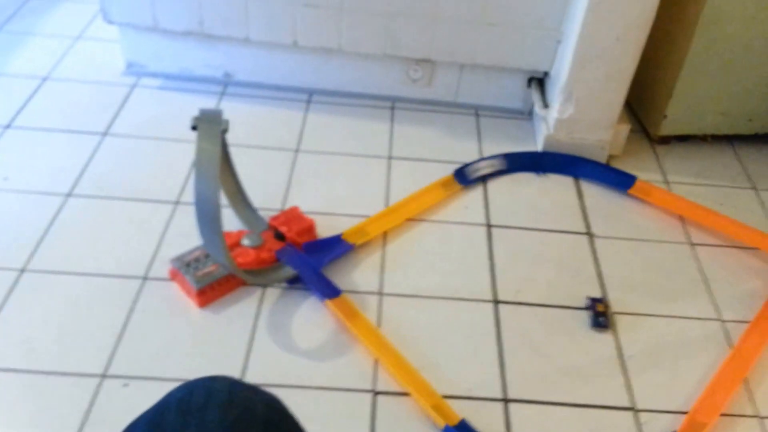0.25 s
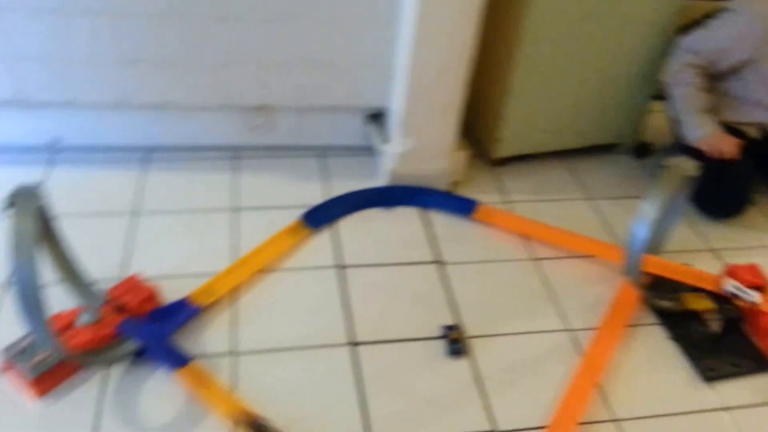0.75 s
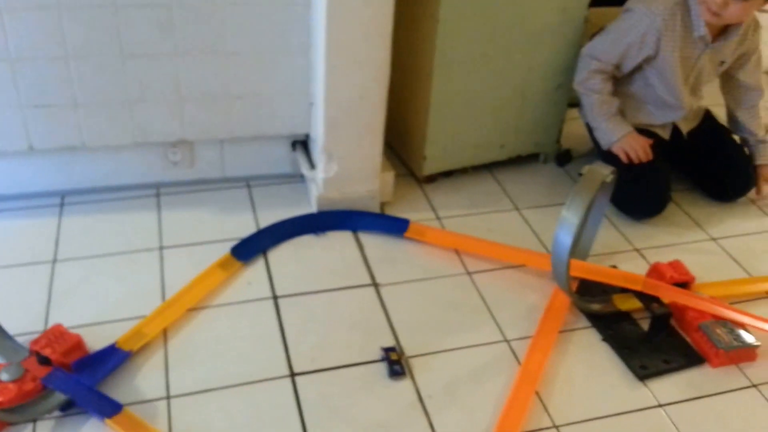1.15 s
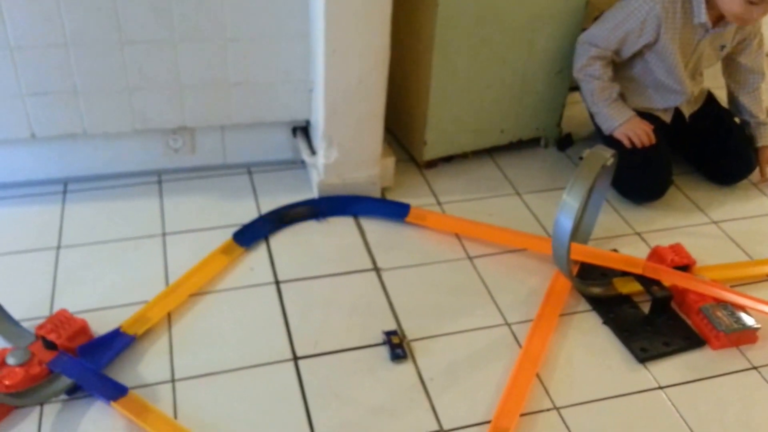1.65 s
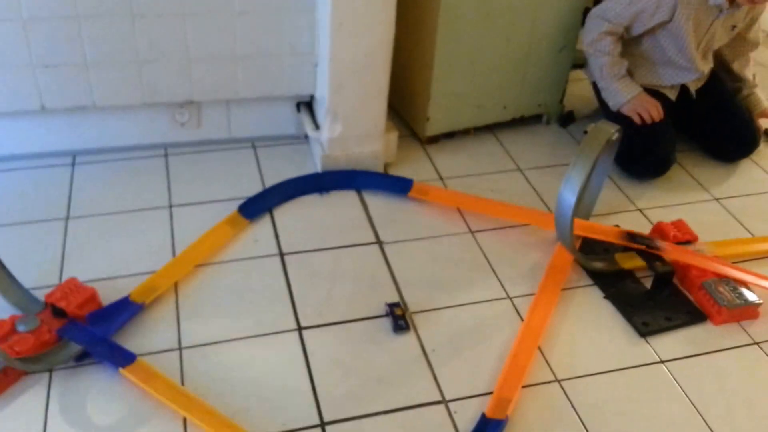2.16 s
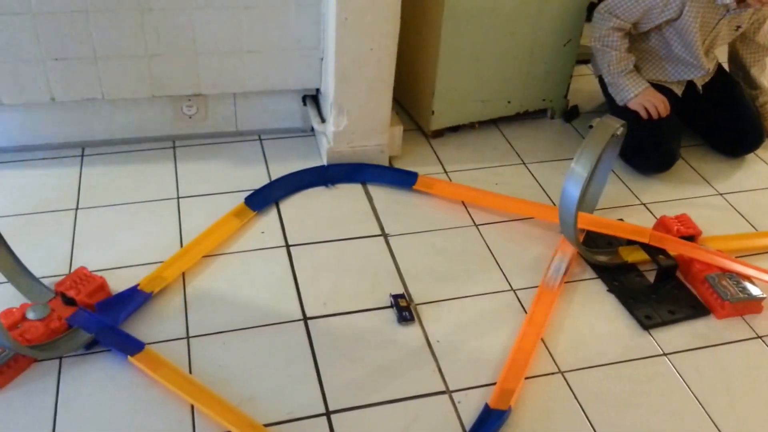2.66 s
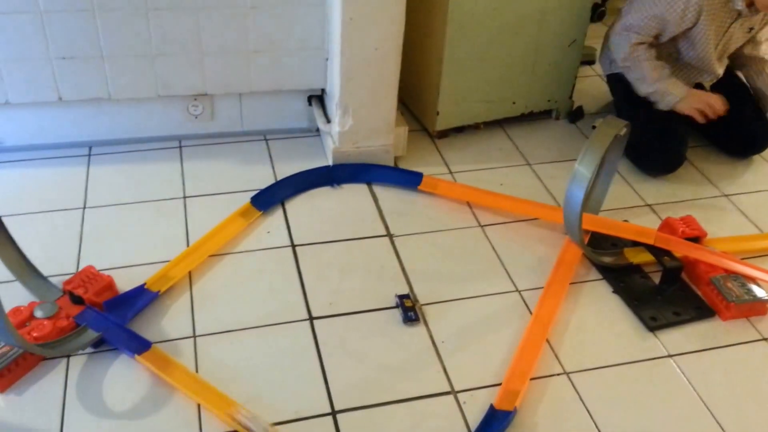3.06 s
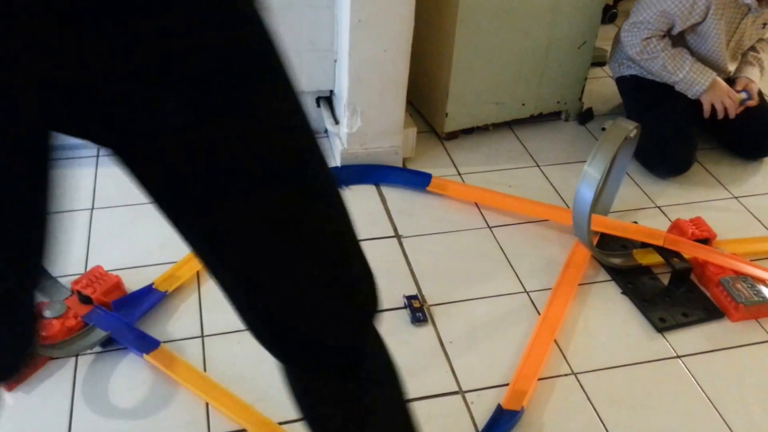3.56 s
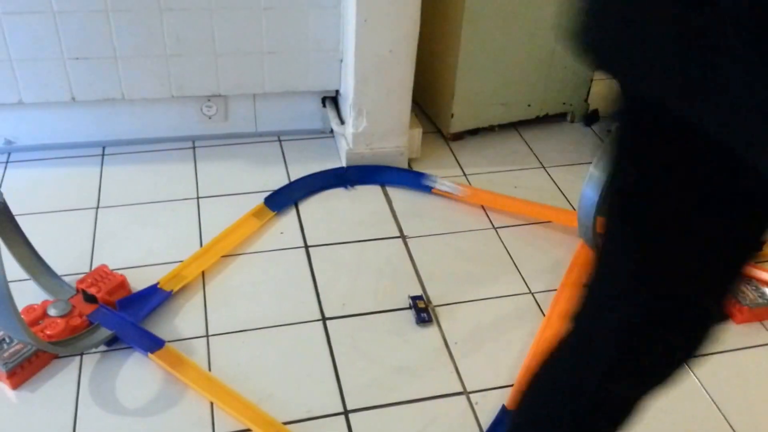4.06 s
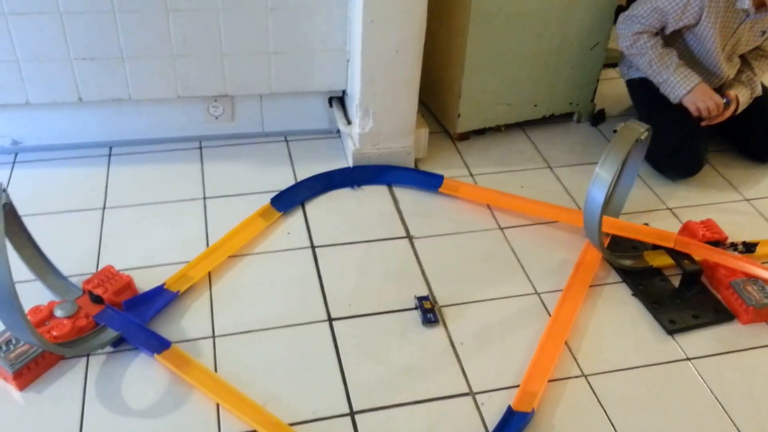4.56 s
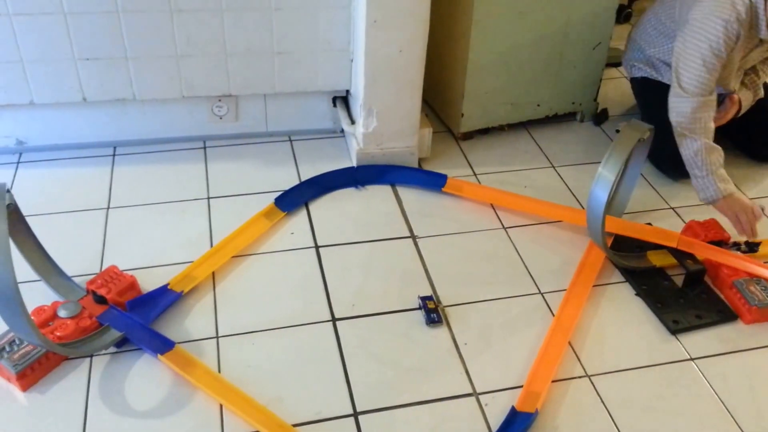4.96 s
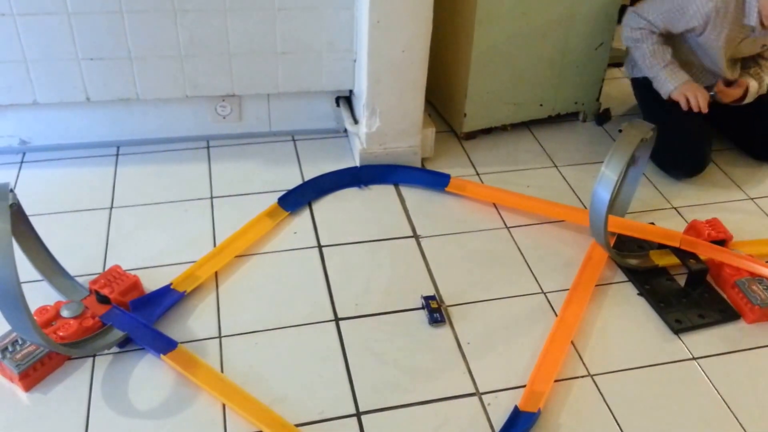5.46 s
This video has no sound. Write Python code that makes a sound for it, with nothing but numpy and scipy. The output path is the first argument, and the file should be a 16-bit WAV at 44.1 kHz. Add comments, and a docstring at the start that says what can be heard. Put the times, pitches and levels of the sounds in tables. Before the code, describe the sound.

Small toy cars run laps on a plastic track laid on tiles. Booster motors whirr throughout, their gears chattering in surges. Wheel patter swells and fades, with resonant stuttering scrapes in bends and sharp clacks at joints. Hard hits come near 1.1, 2.25 and 3.4 seconds, then it grows sparser after 4.2 until a last run from about 4.7. Close stereo microphones, small reverberant room.

```python
"""Toy cars on a plastic track

Cars race a circuit on a tiled floor in a small hard room, with the microphones held above it.
Motor boosters whirr throughout, chatter in surges of gear ticks, ring with loose panels and knock hollowly when hit.
Runs of filtered patter swell and fade as wheels; resonant stutter scrapes in the bends; brief noise flurries
tick over seams, clack on joints and walls, and thud on the floor."""
import sys
import numpy as np
from scipy import signal
from scipy.fft import rfft, irfft
from scipy.io import wavfile

SR = 44100
rng = np.random.default_rng(int(sys.argv[2]) if len(sys.argv) > 2 else 0)


def unload_audio(sound):
    """Save the sound as a 16-bit wav file, at the path given as the first command line argument."""
    columns = np.transpose(np.atleast_2d(sound))
    # keep every value between -1 and 1, then stretch to whole-number steps
    steps = np.round(np.clip(columns, -1, 1) * 32767)
    wavfile.write(sys.argv[1], SR, steps.astype(np.int16))


N = 252252
TIME = np.arange(N) / SR  # seconds


def boosters(whirr_db=-29.0, ring_db=0, chatter_db=-1.0, idle_chatter_db=-41, surge_rise_s=0.026,
             surge_fade_db_per_s=91, wheel_hz=25, wander=0.0964, throb_db=3, flutter_db=1.5,
             teeth_hz=650, soft_hz=3500, slip=0.043, waver_db=1.5):
    """Loose gears tick in the housing, harder once a drive-wheel turn, over a whirr whose whine follows motor speed."""
    # moments when the gears chatter harder: peak_s, level_db (before chatter_db)
    surges = [(0.19, -28), (0.38, -27.5), (0.69, -27), (0.88, -25), (1.35, -37), (1.53, -31), (1.85, -34),
              (2.17, -21.5), (2.81, -28.5), (3.2, -29), (3.44, -35), (3.98, -31.5), (4.18, -50),
              (4.97, -29), (5.12, -29)]
    # colour of the gear mesh: hz, relative_db
    whirr_colour = [(30, -50), (100, -52), (170, -9.5), (300, -2.5), (550, -1), (900, 1.5), (1400, 2),
                    (2000, 2.5), (2600, -1), (4500, -3), (6000, -15), (10000, -33), (14500, -85)]
    # gear noise that rises and falls with motor speed: centre_hz (at mean speed), width_hz (of each pass), gain_db
    whines = [(874, 390, 4), (1885, 570, -3)]

    turns = np.cumsum(wheel_hz * (1 + wander * drift(1.8))) / SR
    throb = amp(throb_db * np.sin(2 * np.pi * turns))
    ticks = below(above(impacts(per_s=660, spread_db=4.5), teeth_hz), soft_hz)
    teeth = room(housing(ticks, waver_db=2.5), early_db=3.0, tail_db=-0.5)
    power = amp(idle_chatter_db) ** 2
    for peak_s, level_db in surges:
        power = power + (amp(level_db) * swell(peak_s, surge_rise_s, surge_fade_db_per_s)) ** 2
    chatter = levelled(teeth * throb, (750, 1150)) * amp(chatter_db) * np.sqrt(power)

    mesh = coloured(impacts(per_s=2200, spread_db=2.0) * amp(flutter_db * drift(29)), whirr_colour)
    speed = 1 + slip * drift(5.9)  # relative to the mean
    whine = np.zeros(N)
    for hz, width_hz, gain_db in whines:
        gain = amp(gain_db + waver_db * drift(4.2))
        whine += gain * resonate_twice(mesh, hz * speed, width_hz)
    body = amp(ring_db) * housing(mesh, waver_db=1)
    whirr = roaming(mesh + whine + body, early_db=6.0, tail_db=-1.5)
    return chatter + amp(whirr_db) * whirr / whirr.mean(0).std()


def housing(x, waver_db=0):
    """The hollow plastic body of a booster; while it shakes, now one mode stands out and now another."""
    # modes of the body: hz, width_hz, gain_db (mean)
    modes = [(322, 23, -1), (462, 55, -9), (551, 10, -20), (596, 32, -3), (697, 81, -1.5), (786, 16, -9),
             (870, 65, 6), (1009, 28, 2), (1062, 66, 4), (1170, 23, -17), (1705, 130, -7), (1860, 290, -13)]
    return sum(amp(gain_db + waver_db * drift(4.7)) * resonate(x, hz, width_hz)
               for hz, width_hz, gain_db in modes)


def wheels(rattle_db=-3.0, hiss_db=-9.0, far_rattle_db=-41, far_hiss_db=-42, rattle_fade_db_per_s=70.5,
           hiss_fade_db_per_s=77, judder_db=2, pan_share=0.74):
    """Hard wheels patter on the plastic strip while the wire axles hiss; the runs add up in power."""
    # cars run onto a piece of track, then coast away: peak_s, approach_s,
    # rattle_level_db (before rattle_db), hiss_level_db (before hiss_db), left_right_db (before pan_share)
    runs = [(0.01, 0.23, -22.5, -30.5, 4), (0.125, 0.017, -23, -36, 1), (0.19, 0.042, -32, -23.5, 8),
            (0.28, 0.065, -25.5, -36, 6), (0.42, 0.29, -28.5, -35, -6), (0.58, 0.12, -25, -35, 4),
            (0.81, 0.37, -26, -38.5, 3), (1.008, 0.028, -23.5, -36.5, -1), (1.094, 0.018, -18.5, -23.5, 1),
            (1.4, 0.086, -25.5, -26.5, 1), (1.51, 0.042, -21.5, -24.5, -0.5), (1.79, 0.097, -23.5, -33, 0),
            (2.255, 0.013, -20.5, -23, 5), (2.305, 0.011, -20.5, -27, 0), (2.66, 0.062, -21.5, -29.5, 4),
            (2.79, 0.032, -27, -46, 1), (2.935, 0.026, -25, -35, 6), (3.04, 0.047, -23, -26, 1),
            (3.14, 0.088, -24.5, -32, 2.5), (3.425, 0.019, -18, -20.5, -0.5), (3.58, 0.023, -27.5, -31, -5),
            (3.8, 0.064, -22.5, -29, -1), (4.01, 0.038, -26, -27.5, -5), (4.76, 0.082, -31.5, -33, 8),
            (5.0, 0.073, -43, -39, -6), (5.21, 0.17, -22, -28, 2.5), (5.624, 0.0011, -20.5, -23, 7)]
    # colour of the plastic strip: hz, relative_db
    track_colour = [(60, -58), (160, -50), (300, -9.5), (700, -2.5), (1350, -6), (1900, 0.5), (2600, 2),
                    (3600, -1), (4500, -0.5), (5600, -10), (8000, -18.5), (14000, -74.5)]
    # colour of the axles: hz, relative_db
    axle_colour = [(1000, -84), (4000, -8), (5500, -1), (7000, 5), (10500, 4.5), (12000, -3.5),
                   (13500, -17), (14500, -49)]

    # steady floor from cars on the far side of the circuit
    rattle_power, hiss_power = amp(far_rattle_db) ** 2, amp(far_hiss_db) ** 2
    for peak_s, rise_s, roll_db, axle_db, pan_db in runs:
        sides = amp(pan_share * np.array([[pan_db], [-pan_db]]) / 2)
        roll = sides * amp(roll_db) * swell(peak_s, rise_s, rattle_fade_db_per_s)
        axle = amp(axle_db) * swell(peak_s, rise_s, hiss_fade_db_per_s)
        rattle_power = rattle_power + roll ** 2
        hiss_power = hiss_power + axle ** 2
    patter = impacts(per_s=1600, spread_db=3.5) * amp(judder_db * drift(37))
    rattle = roaming(coloured(patter, track_colour), early_db=8.5, tail_db=3.0, count=5)
    rattle = levelled(rattle, (3400, 5500))
    hiss = roaming(coloured(patter, axle_colour), early_db=6, tail_db=9.5)
    hiss = levelled(hiss, (6000, 11000))
    return amp(rattle_db) * rattle * np.sqrt(rattle_power) + amp(hiss_db) * hiss * np.sqrt(hiss_power)


def bends(scrape_db=-8.0, fade_db_per_s=149, judder_db=2, slide_s=0.25, spin_hz=105, spin_db=4):
    """Pressed to the outer wall, a car stutters harder once a wheel turn; the wall's ring slides as it moves on."""
    # cars sweep through a bend or loop: peak_s, approach_s, level_db (before scrape_db),
    # ring_hz (at the peak), slide_hz_per_s, width_hz (of each pass)
    sweeps = [(0.11, 0.28, -19.5, 3450, -1000, 1210), (0.29, 0.055, -17.5, 3900, -2000, 1100),
              (0.385, 0.06, -12.5, 2800, -5000, 1050), (.46, 0.047, -22.5, 2500, -1000, 900),
              (0.625, 0.062, -13.5, 2860, -500, 650), (0.7, .05, -17.5, 2950, -800, 700),
              (1.175, 0.055, -15, 3500, -800, 1300), (1.41, 0.16, -18, 3500, -1000, 1410),
              (1.735, 0.022, -13.5, 2930, -2500, 990), (1.82, 0.077, -12, 2580, -1500, 1150),
              (2.325, 0.02, -14, 4000, -3000, 1210), (2.385, 0.04, -14, 3400, -5000, 1700),
              (2.67, 0.073, -14.5, 3170, 3998, 1920), (2.965, 0.046, -15, 2850, -1000, 950),
              (3.085, 0.059, -16, 2700, 500, 1600), (3.505, 0.074, -16.5, 3600, -1500, 1600),
              (3.74, 0.23, -16, 3070, -2000, 2000), (4.003, .012, -15, 2920, -3000, 1200),
              (4.075, 0.036, -17, 2700, 0, 850), (5.285, 0.06, -15, 3330, 0, 1600)]

    scrapes = np.zeros(N)
    turns = np.cumsum(spin_hz * (1 + 0.1 * drift(8.14))) / SR
    spin = spin_db * np.sin(2 * np.pi * turns)
    judder = judder_db * above(drift(130), 41)
    stutter = impacts(per_s=900, spread_db=0.0) * amp(spin + judder)
    for peak_s, rise_s, level_db, hz, slide, width_hz in sweeps:
        near = abs(TIME - peak_s) < .5
        ring_hz = hz + slide * np.clip(TIME[near] - peak_s, -slide_s, slide_s)
        scrape = stutter[near]
        for stage in range(3):  # three passes give the ring steep flanks
            scrape = resonate(scrape, ring_hz, width_hz)
        scrapes[near] += amp(level_db) * swell(peak_s, rise_s, fade_db_per_s)[near] * evened(scrape)
        stutter = np.roll(stutter, SR)  # a different stretch of stutter for the next sweep
    return amp(scrape_db) * roaming(scrapes, early_db=2, tail_db=-5.0)


def knocks(ring_db=0.5, housing_db=4, width_hz=210):
    """A car slams into hollow plastic: a push, the ring of the struck part, and the housing behind it."""
    # cars hit a booster or track support: start_s, blow_db (relative), ring_hz, push_db (relative to the blow)
    hits = [(1.083, -13.5, 715, -15), (1.095, -18, 736, -10), (1.107, -17, 736, -12),
            (2.241, -18, 950, -10), (2.255, -20, 1060, -32), (2.279, -31.5, 1030, 2.5),
            (3.146, -27, 860, -8), (3.406, -20, 930, -7), (3.4205, -23.5, 637, -2), (3.433, -21, 850, -5),
            (5.141, -20.5, 940, -6), (5.625, -33, 920, 1)]
    # colour of the hollow push: hz, relative_db
    push_colour = [(60, -40), (130, -22), (220, -23), (300, 4.5), (430, 16), (540, 9), (700, -3),
                   (1100, -5), (1600, -10), (3500, 6), (9000, -112)]

    blows, rings = np.zeros((2, N))
    for start_s, level_db, hz, push_db in hits:
        blow = amp(level_db) * bounce(t60=0.015)
        ring = resonate_twice(blow, hz, width_hz)
        add(blows, start_s, amp(push_db) * blow)
        add(rings, start_s, evened(ring) * blow.std())
    push = coloured(blows, push_colour)
    struck = push + amp(housing_db) * housing(push) + amp(ring_db) * rings
    return roaming(struck, early_db=11.5, tail_db=-2.5)


def clacks(ring_db=-6.0, shell_db=-7.0, snap_db=-6.5, width_hz=1000, shell_share=0.24, soft_hz=8000):
    """Each clack rings one piece of track; a sharper blow rings the car's shell more and has more bright snap."""
    # cars clack on a joint or wall: start_s, blow_db (relative), ring_hz,
    # treble_db (snap relative to the blow, before snap_db), t60_s (nominal bounce decay)
    hits = [(0.175, -31, 3950, 14.5, 0.035), (0.373, -19, 2650, -26, 0.013), (0.389, -24, 2900, -30, 0.004),
            (0.3918, -15, 2620, -39, 0.004), (0.4017, -18, 2900, -40, 0.0048),
            (0.4233, -14, 2280, -30, 0.029), (0.577, -18.5, 4240, -19, 0.028),
            (0.5875, -22, 2300, -12, 0.0046), (0.61, -19.5, 2860, -30, 0.005),
            (0.6384, -15.5, 2670, -30, 0.0054), (0.675, -16, 3020, -26, 0.017),
            (0.695, -15, 2830, -30, 0.012), (0.7036, -16, 2800, -30, 0.006), (0.815, -24, 6770, -4, 0.045),
            (0.972, -25, 2800, -23, 0.0031), (1.078, -23, 6800, -6, 0.0094), (1.094, -17, 1920, 7, 0.1),
            (1.097, -16, 1900, -16, 0.011), (1.111, -20, 1450, -12, 0.022), (1.126, -21, 3400, -20, 0.014),
            (1.154, -14, 3220, -20, 0.0044), (1.204, -22, 3600, -37, 0.0078),
            (1.335, -18.5, 2000, -7, 0.082), (1.491, -20, 3480, 4, 0.013), (1.508, -26, 3500, 10, 0.07),
            (1.529, -20, 1920, -11, 0.038), (1.542, -21, 2460, -10, 0.0046),
            (1.8045, -11, 2430, -32, 0.038), (1.813, -14, 2680, -29, 0.013),
            (1.836, -12.5, 2380, -18, 0.01), (2.2503, -14, 2430, 0.5, 0.0088),
            (2.257, -16.5, 3750, 3.5, 0.017), (2.2942, -13, 4260, 6.5, 0.0058),
            (2.305, -14, 3960, -20, 0.25), (2.61, -18, 2650, -40, 0.0084),
            (2.629, -16.5, 2550, -22, 0.0065), (2.6463, -20, 2300, -23, 0.0064),
            (2.662, -16, 3400, -23, 0.028), (2.912, -14.5, 4350, -15, 0.086), (2.932, -16, 3820, 1, 0.008),
            (2.955, -14.5, 2930, -31, 0.0065), (2.9744, -17, 2700, -25, 0.004),
            (2.982, -17, 2800, -21, 0.0034), (3.123, -27, 3600, 5, 0.04), (3.146, -23, 2740, -20, 0.0045),
            (3.403, -28, 2200, 1, 0.023), (3.4195, -14, 3670, 5.5, 0.0047),
            (3.421, -12.5, 1800, -10, 0.0062), (3.431, -22, 1400, -14, 0.013),
            (3.46, -22, 1800, -19, 0.012), (3.5819, -18, 3880, 2, 0.011), (4.024, -29, 2800, -25, 0.0048),
            (4.041, -16, 2190, -14, 0.015), (4.062, -13.5, 2420, -17, 0.0093),
            (4.0838, -9.5, 2700, -32, 0.0049), (4.0924, -19.5, 2720, -34, 0.0026),
            (4.703, -26, 3730, 7.5, 0.031), (4.944, -28.5, 3800, 10, 0.079), (5.049, -25.5, 3600, 5, 0.032),
            (5.0874, -25, 3660, 7, 0.012), (5.138, -13, 2450, -2, 0.067), (5.1927, -18, 4570, -9, 0.0079),
            (5.208, -15.5, 4220, 3, 0.034), (5.2386, -22, 2130, 0, 0.013), (5.507, -34, 2020, -12, 0.0027),
            (5.6238, -15, 1750, 5, 0.014), (5.629, -13.5, 3250, -3, 0.021),
            (5.638, -12.5, 4080, -12, 0.018), (5.65, -12, 2070, -17, 0.11), (5.6844, -17, 3850, -16, 0.009),
            (5.694, -17, 1990, -16, 0.063)]
    # colour of the car's shell: hz, relative_db
    shell_colour = [(60, -63), (200, 2), (400, 4), (1300, 11.5), (2000, 14.5), (4300, 3), (5400, -18),
                    (7000, 3.5), (14000, -72)]
    # colour of the snap: hz, relative_db
    snap_colour = [(500, -9.5), (3000, 26), (5500, 16.5), (8000, 7), (11000, 9.5), (14500, 4)]

    rings, shells, snaps = np.zeros((3, N))
    for start_s, level_db, hz, treble_db, t60 in hits:
        blow = amp(level_db) * bounce(t60)
        ring = resonate_twice(blow, hz, width_hz)
        add(rings, start_s, evened(ring) * blow.std())
        add(shells, start_s, amp(shell_share * treble_db) * blow)
        add(snaps, start_s, amp(treble_db) * blow)
    cars = amp(shell_db) * coloured(shells, shell_colour) + amp(snap_db) * coloured(snaps, snap_colour)
    track = roaming(below(rings, soft_hz), early_db=-4, tail_db=-3)
    return amp(ring_db) * track + roaming(cars, early_db=7.5, tail_db=7.5)


def seams(level_db=-6.0, bright_hz=4500, soft_hz=9500):
    """Wheels tick over seams in the track: tiny noise flurries, nearly all treble."""
    # wheel ticks: start_s, blow_db (relative)
    ticks = [(0.135, -27), (0.161, -23), (0.1763, -16), (0.424, -29), (0.5634, -27), (0.817, -34),
             (0.875, -37), (1.003, -29), (1.4913, -16), (1.693, -36), (1.7987, -38), (1.8065, -34),
             (2.9153, -28), (2.9338, -19), (3.149, -29), (3.3058, -21), (3.582, -23), (3.8078, -27),
             (3.8298, -21), (3.9495, -26), (4.0135, -37), (4.0427, -25), (4.646, -27), (4.7035, -26),
             (5.0883, -28)]

    blows = np.zeros(N)
    for start_s, blow_db in ticks:
        add(blows, start_s, amp(blow_db) * bounce(t60=0.004))
    treble = below(above(blows, bright_hz, order=2), soft_hz, order=4)
    return amp(level_db) * roaming(treble, early_db=-3, tail_db=0.0)


def shudders(level_db=-6.5, width_hz=45):
    """Dense noise rings one mode of a loose booster panel; each note swells and stops within hundredths of a second."""
    # panel notes: start_s, note_db (before level_db), ring_hz, length_s
    notes = [(0.87, -32, 848, 0.034), (1.313, -23.5, 1022, 0.053), (2.153, -32, 1020, 0.05),
             (2.45, -20, 881, 0.041), (2.61, -17, 867, 0.043), (2.767, -20, 1012, 0.058),
             (3.623, -21.5, 1012, 0.041), (3.9, -24, 1007, .045), (4.338, -32, 890, 0.055),
             (4.589, -27, 893, .045), (4.617, -27, 1015, .045), (4.945, -20.5, 871, 0.048),
             (5.005, -20, 1029, 0.065), (5.484, -24.5, 1028, 0.056)]

    rings = np.zeros(N)
    for start_s, note_db, hz, length_s in notes:
        shape = signal.windows.hann(round(length_s * SR))
        noise = rng.standard_normal(8192)
        ring = resonate_twice(noise, hz, width_hz)[-len(shape):]  # the end, once it has built up
        add(rings, start_s, amp(note_db) * evened(ring * shape))
    return amp(level_db) * room(rings, early_db=-8, tail_db=-7.0)


def thuds(level_db=-4, rumble_db=-80):
    """Dull blows press the track against the floor, over a faint rumble of small bumps."""
    # blows passed to the floor: start_s, blow_db (relative)
    presses = [(0.819, -53), (0.93, -51), (1.084, -42), (1.096, -41.5), (1.108, -49), (2.165, -51),
               (2.244, -35), (2.256, -35.5), (2.291, -53), (2.929, -50), (3.14, -58), (3.305, -55),
               (3.415, -43), (3.585, -51), (4.069, -42), (4.705, -52), (4.95, -57), (5.05, -54),
               (5.207, -62), (5.624, -45)]
    # colour of the floor: hz, relative_db
    floor_colour = [(15, -12), (40, -6), (70, 1.5), (110, -1), (150, 3.5), (220, -1), (330, -17),
                    (1000, -42)]

    blows = amp(rumble_db) * impacts(per_s=250, spread_db=2)
    for start_s, blow_db in presses:
        add(blows, start_s, amp(blow_db) * bounce(t60=0.03))
    return amp(level_db) * room(coloured(blows, floor_colour), early_db=-15.0, tail_db=-9)


def impacts(per_s, spread_db):
    """A random train of tiny blows of either sign, a few harder than the rest if spread_db is above 0; rms 1."""
    size = amp(spread_db * np.minimum(rng.exponential(1, N), 4))
    return evened(size * rng.choice([-1, 1], N) * (rng.random(N) < per_s / SR))


def bounce(t60, size=8192):
    """A flurry of contacts that builds and dies, with the energy of 10 ms at full level."""
    age = np.arange(size) / SR / t60  # in decay times
    flurry = rng.standard_normal(size) * np.sqrt(age) * amp(-60 * age)
    return flurry / np.linalg.norm(flurry) * np.sqrt(SR / 100)


def swell(peak_s, rise_s, fade_db_per_s, approach_db=7):
    """Gain that grows by approach_db every rise_s as something draws near, peaks at 1 and fades steadily in dB."""
    age = TIME - peak_s
    return amp(np.maximum(np.minimum(approach_db * age / rise_s, -fade_db_per_s * age), -200))


def roaming(x, early_db, tail_db, count=3):
    """As a car or the microphone moves, the reflections change every few centimetres."""
    place = np.cumsum(16 * amp(2 * drift(3))) / SR  # roughly 16 echo sets a second
    # the sound fades from one set of echoes into the next, at constant power
    gaps = [(place - k + count / 2) % count - count / 2 for k in range(count)]
    return sum(room(x * np.cos(np.pi / 2 * np.clip(gap, -1, 1)), early_db, tail_db) for gap in gaps)


def room(x, early_db, tail_db, early_s=0.01, size=16384):
    """Direct sound, quick reflections off tiles and walls, and a tail; stereo width varies with pitch."""
    # reverberation time: hz, t60_s
    decay = [(100, 0.1), (500, 0.36), (2000, 0.77), (5000, 0.7), (14000, 0.13)]
    # stereo width of the room: hz, side_gain_db
    side_width = [(60, 12), (300, -9.5), (600, -4), (1000, -3), (2000, 2.5), (14000, 1.5)]

    t = TIME[:size]
    early, late = rng.standard_normal((2, 2, size)) * (rng.random((2, 2, size)) < .1)
    fade = np.exp(-t / early_s)
    # each frequency band of the tail dies at its own rate
    hz, at, bands = signal.stft(late * (1 - fade), SR, nperseg=256)
    bands = bands * amp(-60 * at / read(decay, hz)[:, None])
    late = signal.istft(bands, SR)[1][:, :size]
    paths = amp(early_db) * evened(early * fade) + amp(tail_db) * evened(late)
    paths[:, 0] += np.sqrt(size)  # direct sound
    centre = paths.mean(0)
    side_gain = amp(read(side_width, np.fft.rfftfreq(2 * size, 1 / SR)))
    side = irfft(rfft(paths[0] - centre, 2 * size) * side_gain)[:size]
    ears = np.array([centre + side, centre - side]) / np.linalg.norm(centre)
    return signal.fftconvolve(x[None], ears, axes=1)[:, :N]


def resonate(x, hz, width_hz):
    """A resonance of gain 1 that may follow a curve."""
    turn = np.exp(2j * np.pi * np.cumsum(hz * np.ones(len(x))) / SR)
    r = np.exp(-np.pi * width_hz / SR)
    # shift the ring down to 0 Hz, smooth it, shift it back
    smooth = signal.lfilter([1 - r], [1, -r], x / turn + 1e-18)
    return 2 * (turn * smooth).real


def resonate_twice(x, hz, width_hz):
    """Two equal resonances in a row, for steeper flanks."""
    return resonate(resonate(x, hz, width_hz), hz, width_hz)


def coloured(x, points, size=4096):
    """Causal minimum-phase filter of unit energy, shaped by the given spectrum."""
    log_gain = np.log(amp(read(points, abs(np.fft.fftfreq(size, 1 / SR)))))
    taps = np.fft.ifft(np.exp(np.conj(signal.hilbert(log_gain)))).real[:size // 2]
    return signal.oaconvolve(x, taps / np.linalg.norm(taps))[:len(x)]


def above(x, edge_hz, order=4):
    """High-pass, steep by default."""
    return signal.sosfilt(signal.butter(order, edge_hz, "high", fs=SR, output="sos"), x)


def below(x, edge_hz, order=2):
    """Low-pass, gentle by default."""
    return signal.sosfilt(signal.butter(order, edge_hz, fs=SR, output="sos"), x)


def drift(per_s):
    """Slow random wander of rms 1; a higher per_s wanders faster."""
    return evened(irfft(rfft(rng.standard_normal(N)) * np.exp(-(np.fft.rfftfreq(N, 1 / SR) / per_s) ** 2), N))


def levelled(x, band):
    """Scales a stereo sound so that its centre has rms 1 inside a band given in Hz."""
    sos = signal.butter(4, band, "band", fs=SR, output="sos")
    return x / signal.sosfilt(sos, x.mean(0)).std()


def evened(x):
    """Scales to rms 1."""
    return x / np.sqrt(np.mean(x ** 2) + 1e-20)


def add(mix, s, sound):
    """Mixes a sound in at time s."""
    part = mix[round(s * SR):][:len(sound)]
    part += sound[:len(part)]


def read(points, hz):
    """Joins a spectrum's points on a log-frequency axis."""
    f, value = np.transpose(points)
    return np.interp(np.log(hz + 1), np.log(f + 1), value)


def amp(db):
    """Decibels to gain."""
    return np.exp(np.asarray(db) * (np.log(10) / 20))


def scene(body_hz=200):
    """Boosters, rolling cars and their collisions, whose small plastic parts radiate little bass, plus floor thuds."""
    plastic = boosters() + shudders() + wheels() + bends() + seams() + knocks() + clacks()
    return above(plastic, body_hz, order=6) + thuds()


def record(dry, edge_hz=14750):
    """The two microphones differ in colour; peaks clip at full scale; then the treble is cut above edge_hz."""
    # difference between the microphones: hz, left_right_db
    balance = [(60, 10), (150, -3), (400, -2), (800, -2), (1400, 3), (2500, 3.5), (4000, 0), (5500, -3.5),
               (8000, -5.5), (10000, -4), (12500, 4.5)]

    tilt_db = read(balance, np.fft.rfftfreq(N, 1 / SR))
    heard = irfft(rfft(dry) * amp(np.array([tilt_db, -tilt_db]) / 2), N)
    heard = np.clip(heard, -1, 1)
    band_limit = signal.firwin(401, edge_hz, window=("kaiser", 9), fs=SR)
    return signal.oaconvolve(heard, band_limit[None], "same")


dry = scene()
out = record(dry)
unload_audio(out)
```